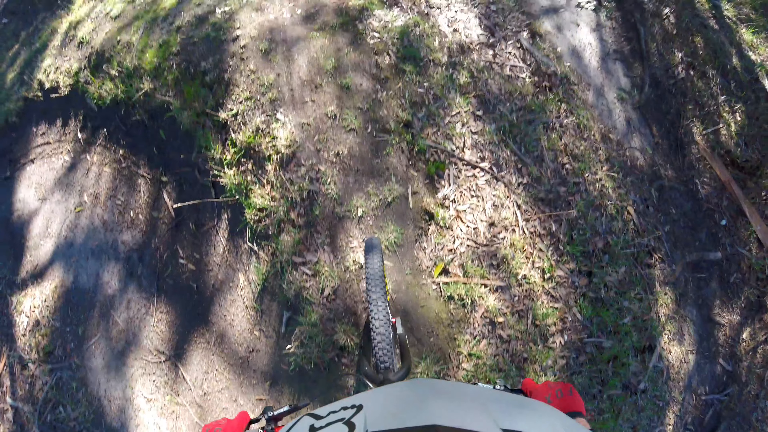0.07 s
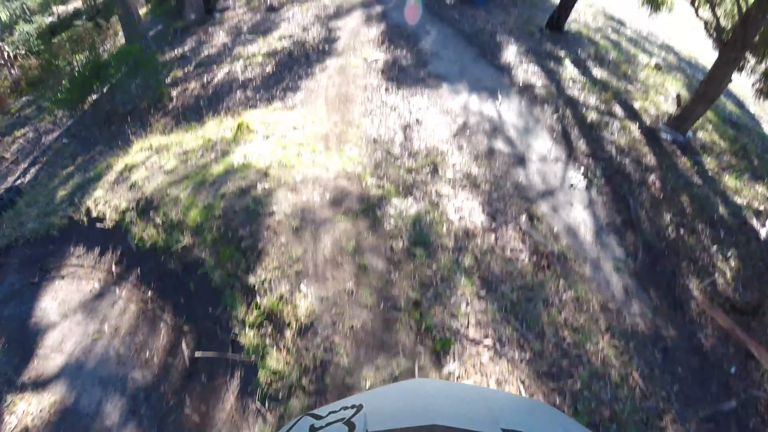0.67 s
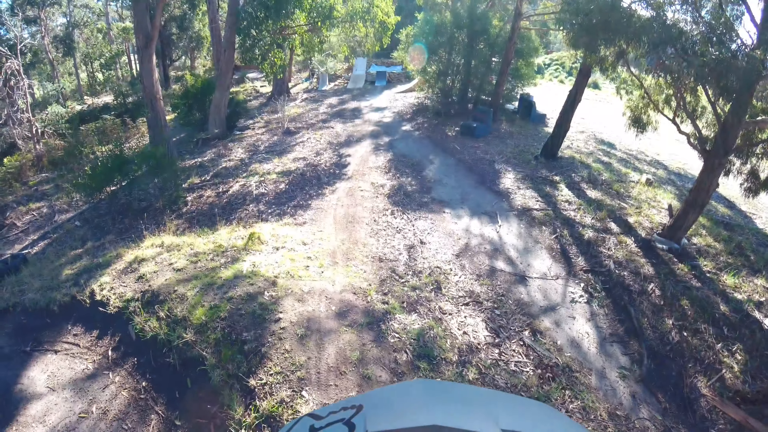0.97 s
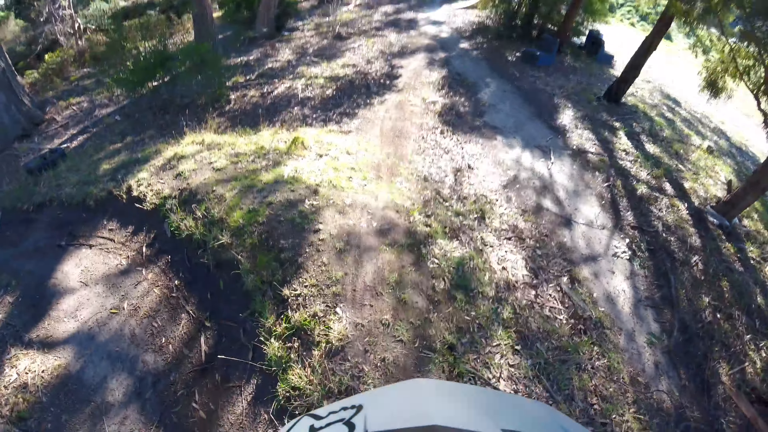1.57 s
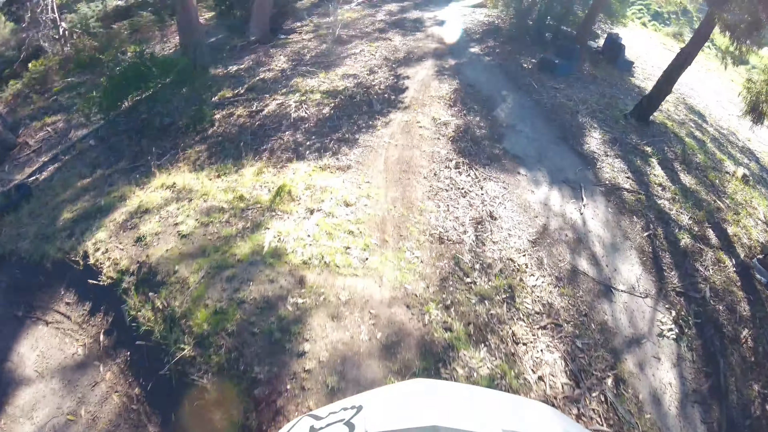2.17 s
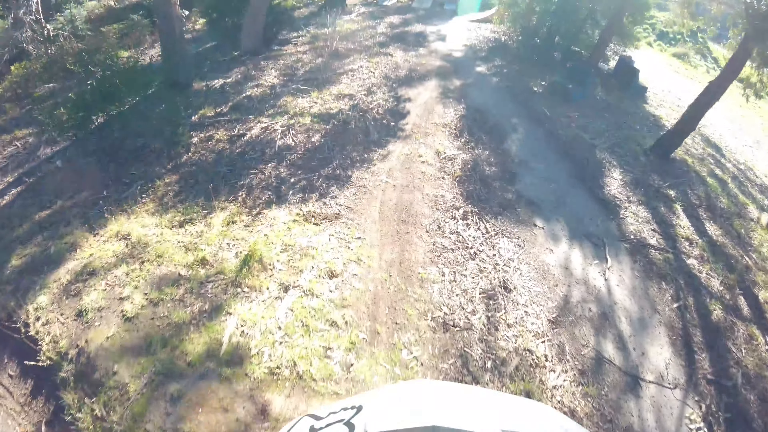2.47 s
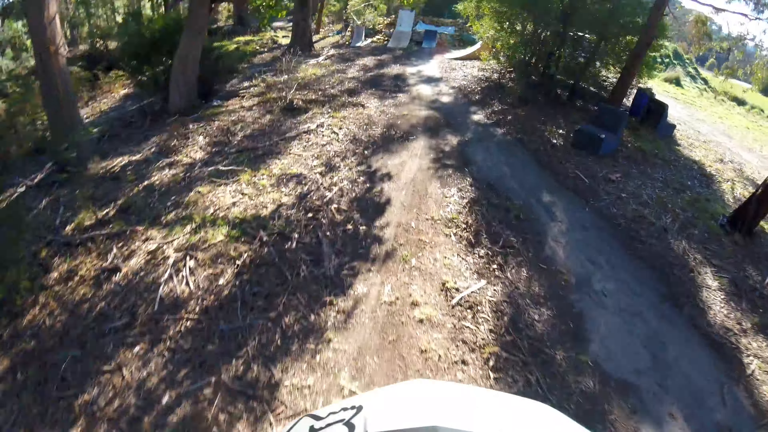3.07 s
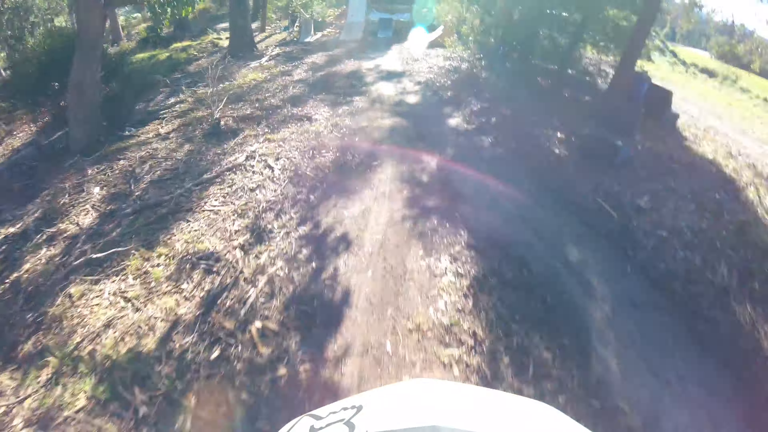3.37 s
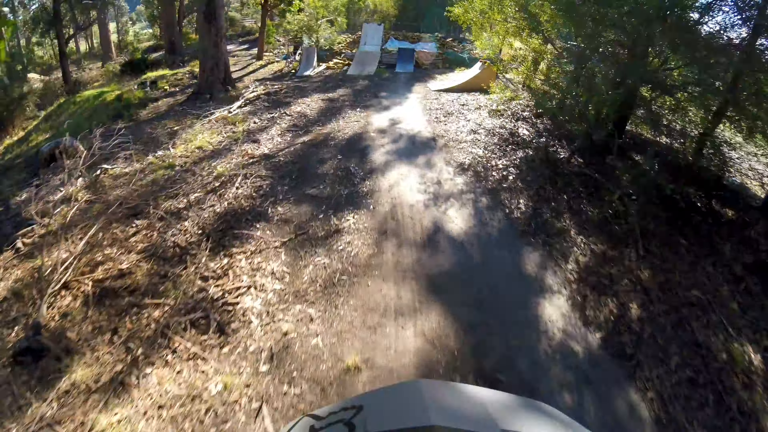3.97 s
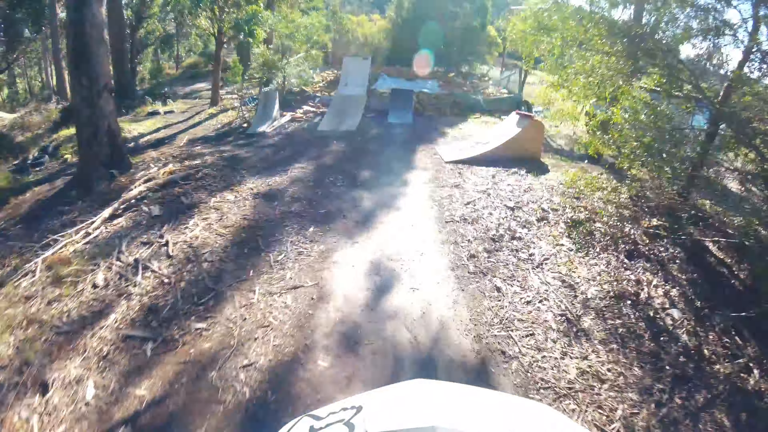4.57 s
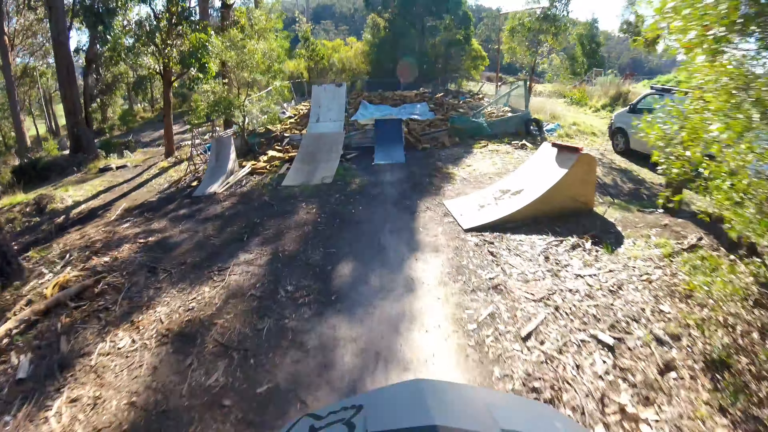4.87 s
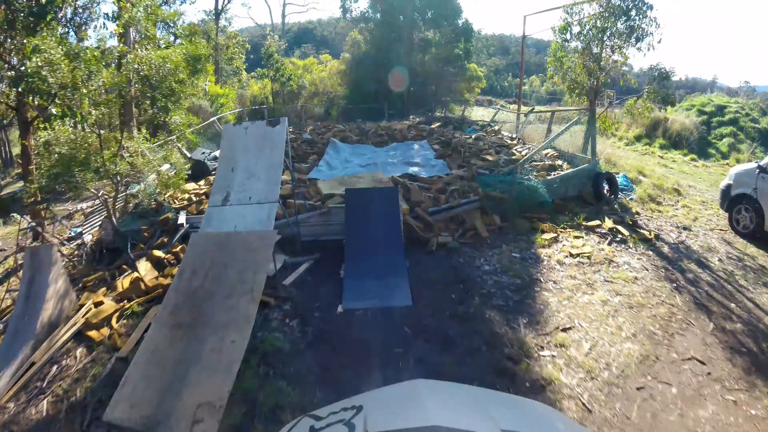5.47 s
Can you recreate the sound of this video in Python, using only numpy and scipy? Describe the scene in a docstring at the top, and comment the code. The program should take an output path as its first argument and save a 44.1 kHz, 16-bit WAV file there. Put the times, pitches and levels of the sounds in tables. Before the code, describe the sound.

A mountain bike knocks and rattles over a dirt track among twittering birds, then wind buffets the microphone as it speeds up.

```python
"""Knocks and rattles from a mountain bike rolling over bumps, with small birds twittering in the trees.
We ride along at a microphone on the rider's helmet. The tyres crunch over dirt and dry leaves and flick
up stones, while the birds chip and trill close by and pipe and whistle farther off. As the bike gathers
speed the wind takes over: it buffets the microphone, drones round the helmet and tears into a rush."""
import sys
import numpy as np
from scipy import signal
from scipy.fft import rfft, irfft, next_fast_len
from scipy.io import wavfile
from scipy.ndimage import uniform_filter1d, map_coordinates

SR = 44100
rng = np.random.default_rng(int(sys.argv[2]) if len(sys.argv) > 2 else 0)


def put_to_file(sound):
    """Save the sound as 16-bit audio at rate SR, in the file named by the first command-line argument."""
    columns = np.atleast_2d(sound).T  # one column per channel
    safe = np.clip(columns, -1, 1)
    whole_steps = np.round(safe * 32767)
    wavfile.write(sys.argv[1], SR, whole_steps.astype(np.int16))


N = 248283
T = np.arange(N) / SR
CRUISE_M_S = 5  # the speed at which tyre and wind levels are set


def undb(db):
    """Decibels to gain."""
    return 10 ** (np.asarray(db) / 20)


def unit(x):
    """Scale to rms 1."""
    return x / np.sqrt(np.mean(x ** 2))


def colour(x, spectrum):
    """EQ a sound through (freq_hz, gain_db) points and bring it to rms 1."""
    hz, db = np.transpose(spectrum)
    size = next_fast_len(len(x))
    bin_hz = np.maximum(np.arange(size // 2 + 1) * SR / size, 1)
    eq_db = np.interp(np.log(bin_hz), np.log(hz), db, left=db[0] - 26, right=db[-1] - 20)
    return unit(irfft(rfft(x, size) * undb(eq_db), size)[:len(x)])


def noise(spectrum):
    """Coloured noise at rms 1."""
    return colour(rng.standard_normal(N), spectrum)


def drift(rate):
    """A smooth random modulator at rms 1, with about `rate` turns a second."""
    lowpass = signal.butter(2, rate / 2, fs=SR, output="sos")
    return unit(signal.sosfilt(lowpass, rng.standard_normal(N)))


def grains(per_s, spread_db):
    """Random clicks, mostly small with a few large ones."""
    size = undb(spread_db * np.minimum(rng.exponential(size=N), 4))
    return (rng.random(N) < per_s / SR) * size * rng.standard_normal(N)


def burst(spectrum, t60_s):
    """A short crack of coloured noise with peak 1."""
    t = T[:SR // 2]
    envelope = undb(-60 * t / t60_s) * (1 - np.exp(-t / 0.00055))
    crack = colour(rng.standard_normal(len(t)), spectrum) * envelope
    return crack / np.abs(crack).max()


def add(out, start_s, sound):
    """Mix a sound in at a time."""
    i = max(int(start_s * SR), 0)
    out[i:i + len(sound)] += sound[:max(N - i, 0)]


def swells(table, attack_s, release_s):
    """An envelope that rises, holds and falls for each row of start_s, length_s, height."""
    envelope = np.zeros(N)
    for start_s, length_s, height in table:
        end_s = start_s + length_s
        corners_s = [start_s, start_s + min(attack_s, length_s), end_s, end_s + release_s]
        envelope += height * np.interp(T, corners_s, [0, 1, 1, 0])
    return envelope


def bouts(table, attack_s, release_s):
    """Swells whose heights are given in dB."""
    return swells([(s, length_s, undb(db)) for s, length_s, db in table], attack_s, release_s)


def speed_gain(speed, cruise_db, db_per_doubling):
    """A fader that rides up as a power of speed."""
    return undb(cruise_db + db_per_doubling * np.log2(np.maximum(speed, 1e-3) / CRUISE_M_S))


# the bed of still air among the trees: freq_hz, gain_db
WOODS_EQ = [(12, -17), (22, 2.5), (45, -1.5), (70, -10), (110, -13.5), (170, -5), (230, -10.5), (310, -20),
            (420, -16), (656, -24.5), (1400, -31.5), (2500, -46.5), (4300, -67), (5700, -43.5),
            (7100, -35.5), (8000, -36.5), (10500, -43), (12000, -49), (15000, -54.5)]

def woods():
    """Soft rumble and hiss of outdoor air, drifting slowly in level."""
    return undb(-47.5 + 0.27 * drift(3.6)) * noise(WOODS_EQ)


def tree_echo(x, t60_s):
    """A diffuse tail scattered back by trunks and foliage."""
    tail = rng.standard_normal(SR) * undb(-60 * T[:SR] / t60_s)
    return signal.fftconvolve(x, tail / np.linalg.norm(tail))[:N]


def whistle(length_s, pitch_hz, bend):
    """One wavering bird note; `bend` is its first and last pitch as ratios to the middle one."""
    waver_depth, waver_s = .006, .008
    progress = np.linspace(0, 1, int(length_s * SR))
    waver = np.interp(progress * length_s / waver_s, np.arange(64), rng.standard_normal(64))
    contour = np.polyval(np.polyfit([0, .5, 1], [bend[0], 1, bend[1]], 2), progress)
    hz = pitch_hz * contour * (1 + waver_depth * waver)
    envelope = np.sin(np.pi * progress).clip(0) ** 0.51
    return envelope * np.sin(2 * np.pi * np.cumsum(hz) / SR)


def note_run(note, start_s, period_s, count):
    """One note repeated evenly."""
    out = np.zeros(N)
    for k in range(count):
        add(out, start_s + period_s * k, note)
    return out


# long sagging whistles: start_s, pitch_hz, level_db
SLURS = [(.845, 4800, -62), (1.25, 5290, -66), (1.732, 4860, -57)]
# wide downward sweeps: start_s, length_s, pitch_hz, level_db
SWEEPS = [(2.217, 0.041, 5160, -55), (2.696, 0.021, 3450, -54), (3.525, 0.094, 5554, -57.5),
          (3.811, .09, 4195, -58.5), (5.121, .07, 7540, -63)]

def far_calls():
    """Birds deeper in the wood, their falling calls smeared by the trees."""
    calls = np.zeros(N)
    for start_s, pitch_hz, level_db in SLURS:
        add(calls, start_s, undb(level_db) * whistle(.105, pitch_hz, bend=(1.0, .85)))
    for start_s, length_s, pitch_hz, level_db in SWEEPS:
        add(calls, start_s, undb(level_db) * whistle(length_s, pitch_hz, bend=(1.25, .67)))
    return calls + undb(-0.5) * tree_echo(calls, t60_s=0.39)


def piping_bird():
    """A distant bird pipes an even run of low notes that ring on among the trunks."""
    note = whistle(length_s=.029, pitch_hz=1135, bend=(1.103, .89))
    run = undb(-55) * note_run(note, start_s=.085, period_s=.1215, count=12)
    return run + undb(-4) * tree_echo(run, t60_s=0.45)


# the trill's narrow treble band: freq_hz, gain_db
TRILL_EQ = [(5000, -36), (6100, -7), (6700, 0), (7200, -3), (7700, -13.5), (8800, -48)]
# bouts of trilling: start_s, length_s, level_db
TRILLS = [(1.28, 0.21, -65), (1.54, 0.37, -60.5), (2.32, 0.22, -57.5), (2.6, 1.2, -64)]

def trill():
    """A bird's high buzz: a band of noise pulsing about 85 times a second."""
    pulse_hz = 85 * (1 + .12 * drift(30))
    pulse = np.sin(2 * np.pi * np.cumsum(pulse_hz) / SR)
    buzz = unit(noise(TRILL_EQ) * undb(4.8 * pulse))
    return buzz * bouts(TRILLS, attack_s=0.012, release_s=0.081)


# the near birds' syllables: length_s, (start_ratio, end_ratio)
FALL = (.017, (1.15, .89))
ARCH = (.0233, (.89, .83))
RISE = (.017, (.82, 1.12))

def twitter(from_s, to_s, count):
    """Faint filler: arched and falling chirps take turns, loose in timing, pitch and length."""
    out, step_s = np.zeros(N), (to_s - from_s) / count
    for k, (late, detune, stretch) in enumerate(2 * rng.random((count, 3)) - 1):
        length_s, bend = FALL if k % 2 else ARCH
        note = whistle(length_s * (1 + stretch / 2), 6100 * (1 + 0.096 * detune), bend)
        add(out, from_s + step_s * (k + late / 2), note)
    return undb(-61) * out


# falling chips, arched chirps and rising chirps: start_s, pitch_hz, level_db
FALLS = [(.168, 5900, -59), (.505, 6400, -56), (.722, 6900, -53), (.784, 6100, -47), (.925, 6900, -55.5),
         (.995, 6100, -55.5), (1.022, 5400, -64), (1.16, 7050, -55), (1.215, 6150, -49.5),
         (1.388, 6600, -55), (1.45, 6100, -49), (1.672, 6450, -49), (1.905, 6500, -52),
         (2.138, 6500, -45.5), (2.283, 6800, -44)]
ARCHES = [(.052, 6300, -54), (.594, 6350, -56), (.668, 6450, -52), (.881, 6280, -54), (1.317, 6470, -54.5),
          (1.624, 5900, -54), (1.714, 5770, -53), (1.931, 5750, -53.5), (2.162, 6200, -49.5),
          (2.431, 5750, -50)]
RISES = [(.948, 5100, -60), (1.11, 5970, -56.5), (1.842, 5770, -56), (1.998, 6700, -52)]
# pips on a near-steady pitch: start_s, length_s, pitch_hz, level_db
PIPS = [(.2, .04, 5050, -60), (.445, .025, 5100, -60), (2.712, 0.053, 2145, -58.5),
        (4.565, 0.023, 5233, -50), (4.883, 0.041, 5600, -52.5), (5.198, 0.05, 6190, -47.5),
        (5.396, 0.087, 6670, -51), (5.559, 0.079, 6864, -48)]

def song():
    """The featured bird notes: chirps, pips and one stutter of four tiny chips."""
    chip = whistle(length_s=.009, pitch_hz=7000, bend=(1.05, .965))
    out = undb(-47) * note_run(chip, start_s=2.015, period_s=.0142, count=4)
    for table, (length_s, bend) in (FALLS, FALL), (ARCHES, ARCH), (RISES, RISE):
        for start_s, pitch_hz, level_db in table:
            add(out, start_s, undb(level_db) * whistle(length_s, pitch_hz, bend))
    for start_s, length_s, pitch_hz, level_db in PIPS:
        add(out, start_s, undb(level_db) * whistle(length_s, pitch_hz, bend=(.99, .99)))
    return out


def near_birds():
    """Small birds close by, their notes fluttering in level, with a short echo off the trees."""
    notes = song() + twitter(from_s=0.23, to_s=3, count=40)
    voices = notes * undb(2.3 * drift(150)) + trill()
    return voices + undb(-7.5) * tree_echo(voices, t60_s=0.19)


# tread roar, grit fizz, leaf crunch and the snap of a stone: freq_hz, gain_db
TREAD_EQ = [(120, 5), (300, 1), (600, 2.5), (1200, -1.5), (1800, -5.5), (2100, -9), (2800, -11.5),
            (4000, -33), (8000, -51.5)]
GRIT_EQ = [(1500, -12.5), (3400, 1.5), (4300, -4), (5400, 5), (6500, -2), (8000, -8.5), (10500, -7),
           (11800, -20), (13500, -21.5), (15500, -30.5)]
LEAF_EQ = [(500, 6), (1200, -2.5), (1750, 3), (2300, -16), (3500, -9), (4300, -22.5), (9000, -22)]
FLICK_EQ = [(1500, -5), (4000, -4), (5500, 0.5), (8000, -4), (10800, -9), (13000, -14), (15500, -24.5)]
# patches of dry leaves: start_s, length_s, level_db
LEAF_PATCHES = [(.48, 0.23, -62), (1.47, 0.068, -54.5), (1.95, 0.052, -57), (2.53, 0.03, -53),
                (2.76, 0.15, -50.5), (3.06, 0.092, -47), (3.99, 0.047, -41.5)]
# flicked stones and twigs: start_s, peak_db
FLICKS = [(1.178, -44), (1.238, -44), (1.583, -38), (3.329, -40), (3.494, -40), (3.5, -34.5), (3.656, -40),
          (3.915, -44), (4.043, -36), (4.216, -36), (4.390, -35.5), (4.453, -37), (4.519, -41),
          (4.821, -39.5), (4.935, -38), (5.103, -36.5), (5.198, -34.5)]

def tyres(speed):
    """Knobs roar on uneven dirt, crush grit and leaves, and flick the odd stone."""
    ground = drift(18)
    tread = colour(unit(grains(1800, spread_db=1)) + 0.89 * rng.standard_normal(N), TREAD_EQ)
    grit = colour(unit(grains(1200, spread_db=1.5)) + 1.56 * rng.standard_normal(N), GRIT_EQ)
    leaves = colour(grains(3000, spread_db=3.5), LEAF_EQ)
    out = tread * speed_gain(speed, cruise_db=-41, db_per_doubling=8.5) * undb(3.1 * ground)
    out += grit * speed_gain(speed, cruise_db=-58, db_per_doubling=5) * undb(2.9 * ground)
    out += leaves * bouts(LEAF_PATCHES, attack_s=0.018, release_s=0.045)
    for start_s, peak_db in FLICKS:
        add(out, start_s, undb(peak_db) * burst(FLICK_EQ, t60_s=0.0075))
    return out


def modes(table, t, scatter):
    """Decaying partials, slightly detuned on every blow."""
    detunes = 1 + scatter * rng.standard_normal(len(table))
    return sum(undb(db - 60 * t / t60_s) * np.sin(2 * np.pi * hz * detune * t)
               for (hz, db, t60_s), detune in zip(table, detunes))


# the ring of the frame and of its thin metal parts: pitch_hz, level_db, t60_s
FRAME_MODES = [(225, -0.5, 0.031), (271.7, -4, 0.07), (372, -6, 0.019), (436, -12.5, 0.011)]
METAL_MODES = [(564, -13, .14), (1288, -11, 0.11)]
# the clack of loose parts: freq_hz, gain_db
CLACK_EQ = [(300, 11), (800, -0.5), (1300, 8), (1800, -13), (2500, -9.5), (3200, -21.5), (4300, -31.5),
            (9000, -28)]
# bumps in the track: start_s, thump_db, clack_db
BUMPS = [(.036, -34.5, -45.5), (0.077, -28, -49), (0.085, -39, -29), (0.269, -35.5, -62),
         (0.383, -50, -38.5), (0.542, -30, -38), (0.613, -57, -39), (0.82, -20.5, -35.5),
         (0.839, -23.5, -42.5), (0.915, -31, -41.5), (.938, -38, -66), (2.521, -26, -46),
         (2.538, -21.5, -37), (2.804, -25, -45), (2.852, -36, -41), (2.889, -18.5, -31)]

def knocks():
    """Each bump thumps the frame, makes its loose parts clack, ring and rattle, and sways the helmet."""
    sway_hz, sway_t60_s, rattle_t60_s = 26.7, 0.74, 0.5
    out, shaking, t = np.zeros(N), np.zeros(N), T[:SR // 2]
    cushion = 1 - np.exp(-t / 0.0041)  # the tyre softens the attack
    sway = undb(-7.5 - 60 * t / sway_t60_s) * np.sin(2 * np.pi * sway_hz * t)
    for start_s, thump_db, clack_db in BUMPS:
        ring = modes(FRAME_MODES, t, scatter=.038) * cushion
        thump = ring / np.abs(ring).max() + sway
        clack = burst(CLACK_EQ, t60_s=0.038) + modes(METAL_MODES, t, scatter=.012)
        add(out, start_s, undb(thump_db) * thump + undb(clack_db) * clack)
        add(shaking, start_s, undb(clack_db - 22.5 - 60 * t / rattle_t60_s))
    rattle = signal.fftconvolve(grains(300, spread_db=0), burst(CLACK_EQ, t60_s=0.013))[:N]
    return out + shaking * unit(rattle)


# gusts that lock into a hum: middle_s, length_s, pitch_hz, peak_db
HUMS = [(4.187, 0.043, 173, -9), (4.242, 0.039, 173.3, -7.5), (4.394, 0.091, 172.4, -10),
        (4.777, 0.13, 180.8, -4.5), (5.599, 0.072, 218.7, -8.5)]

def helmet_hums():
    """For a few cycles eddies shed in step off the helmet's edge and give a wavering low note."""
    out, waver = np.zeros(N), 1 + 0.03877 * drift(66.45)
    for middle_s, length_s, pitch_hz, peak_db in HUMS:
        swell = np.cos(np.pi * np.clip((T - middle_s) / length_s, -.5, .5))
        out += undb(peak_db) * swell * np.sin(2 * np.pi * np.cumsum(pitch_hz * waver) / SR)
    return out


def airflow(spectrum, evenness):
    """Air pressure at rms 1, its slow swells ridden down as in a steady stream (evenness 0 to 1)."""
    pressure = noise(spectrum)
    power = uniform_filter1d(pressure ** 2, SR // 16) + 1e-9
    return unit(pressure / power ** (evenness / 2))


def swept_past(eddies, air_speed):
    """Varispeed on passing eddies: slow air stretches them, fast air hurries them."""
    rate = (np.maximum(air_speed, 1e-3) / CRUISE_M_S) ** .3
    return map_coordinates(eddies, [np.cumsum(rate)], order=1, mode="mirror")


# the wind's low buffet, hollow drone and bright rush: freq_hz, gain_db
BUFFET_EQ = [(10, -7), (22, 1), (55, -2.5), (110, -4.5), (150, -10.5), (250, -34), (500, -54.5)]
DRONE_EQ = [(80, -18.5), (140, -2.5), (178, -3.5), (215, -8), (320, -12.5), (420, -20.5), (600, -41),
            (1200, -59)]
RUSH_EQ = [(150, -10), (330, 2), (500, 1), (800, -5), (1100, -12), (1800, -18.5), (2600, -27.5),
           (3600, -47.5), (6000, -63.5)]
# gusts of headwind, lulls where negative: start_s, length_s, added_speed_m_s
GUSTS = [(2.87, 0.13, 0.42), (3.0, .03, -.5), (3.08, 0.059, 0.84), (3.21, 0.086, -.4), (3.32, 0.082, 1.1),
         (3.55, 0.075, -0.5), (3.71, 0.15, 0.3), (4.15, 0.077, 0.5), (4.34, 0.085, 1.5), (4.5, 0.058, 1.56),
         (4.63, 0.033, -.5), (4.715, 0.29, 3), (5.02, 0.1, 2), (5.14, 0.078, 2.5), (5.33, 0.055, 1.7),
         (5.45, 0.21, 2)]

def wind(speed):
    """Large eddies thump the microphone, smaller ones drone round the helmet, the finest tear off."""
    air_speed = speed + swells(GUSTS, attack_s=0.03, release_s=0.033)
    buffet = swept_past(airflow(BUFFET_EQ, evenness=0.83), air_speed)
    drone = airflow(DRONE_EQ, evenness=1.0)
    # fine turbulence rides in bursts on the pressure swings of the larger eddies
    tearing = unit(undb(1.15 * drift(60) + 1.84 * buffet + 1.6 * drone))
    rush = noise(RUSH_EQ) * tearing
    buffet_gain = speed_gain(air_speed, cruise_db=-3, db_per_doubling=20.5)
    buffet_gain /= np.hypot(1, buffet_gain / undb(-15))  # levels off at -15 dB in fast air
    drone_gain = speed_gain(air_speed, cruise_db=-24.5, db_per_doubling=15)
    rush_gain = speed_gain(air_speed, cruise_db=-36, db_per_doubling=20)
    return buffet * buffet_gain + drone * drone_gain + rush * rush_gain


# the bike creeps, then runs downhill: time_s, speed_m_s
BIKE_SPEED = [(0, 1.23), (.6, 1.245), (1.15, 1.03), (2.08, 1.175), (2.27, 1.89), (2.42, 1.54), (2.58, 2.45),
              (2.8, 1.91), (3.1, 2.87), (3.55, 3.65), (3.9, 4.37), (4.65, 4.89), (5.63, 6.74)]

def scene():
    """The mono mix at the helmet; the bike's speed drives wind and tyres."""
    time_s, speed_m_s = np.transpose(BIKE_SPEED)
    speed = np.interp(T, time_s, speed_m_s)
    ride = wind(speed) + helmet_hums() + tyres(speed) + knocks()
    return (ride + piping_bird() + near_birds() + far_calls() + woods())[None]


def record(dry):
    """The microphone opens after a moment, soft-clips the strongest gusts and cuts the top."""
    open_s, top_hz, drive = .035, 15200, .7
    rounded = np.tanh(drive * dry) / drive
    lowpass = signal.ellip(8, .2, 70, top_hz, fs=SR, output="sos")
    return signal.sosfilt(lowpass, rounded * (T >= open_s))


dry = scene()
out = record(dry)
put_to_file(out)
```